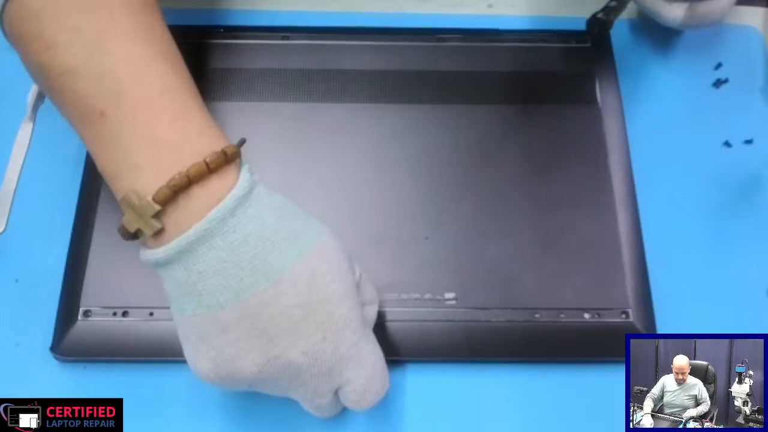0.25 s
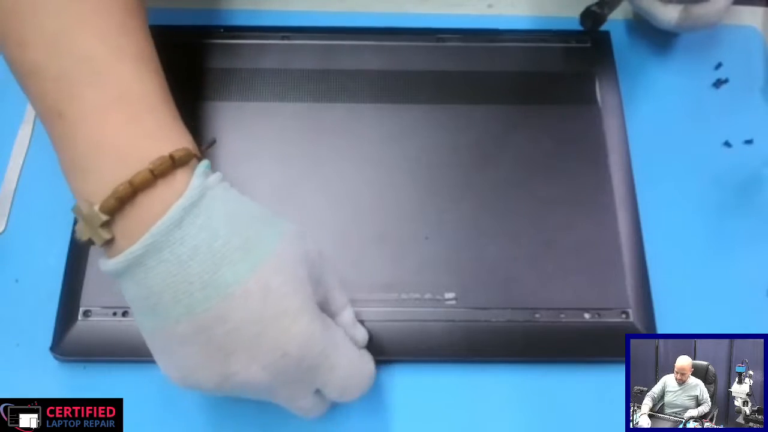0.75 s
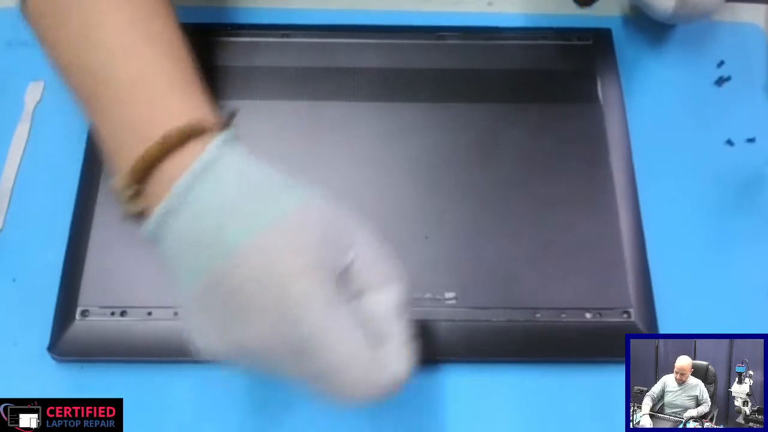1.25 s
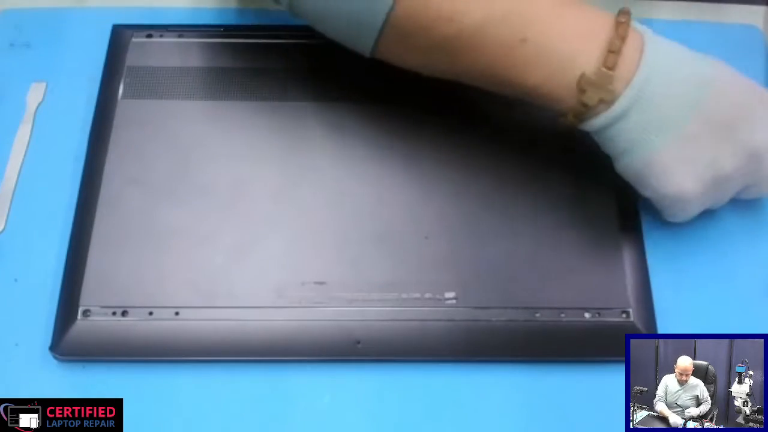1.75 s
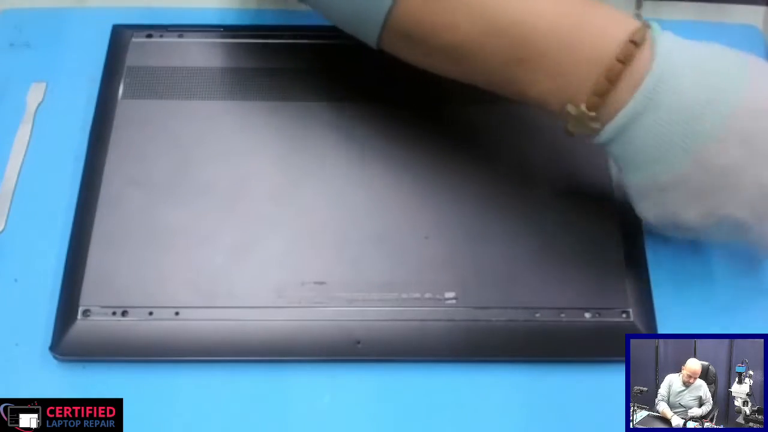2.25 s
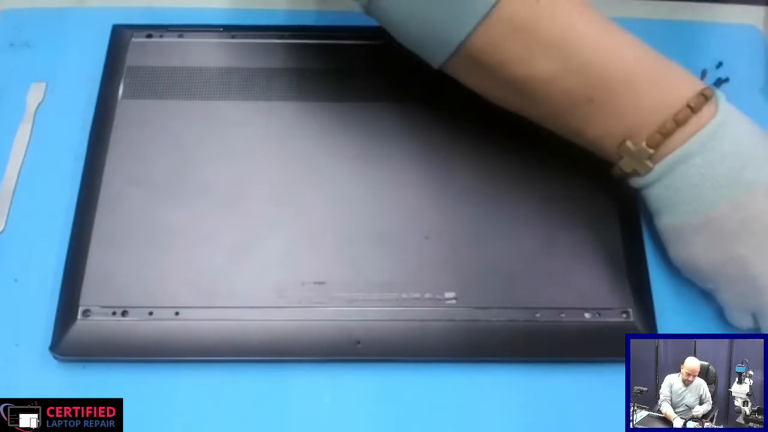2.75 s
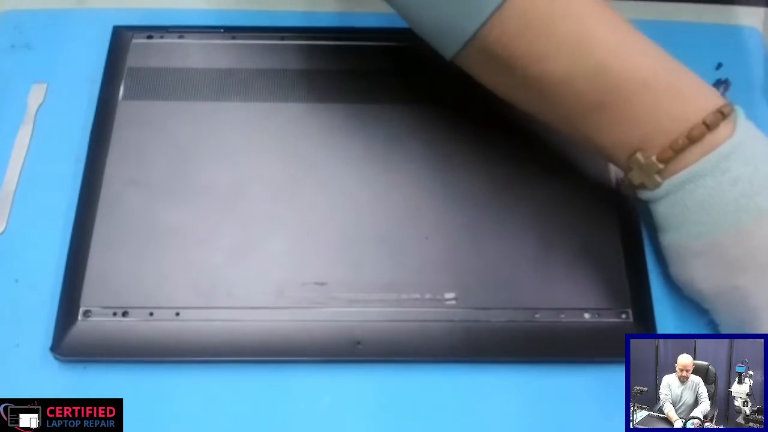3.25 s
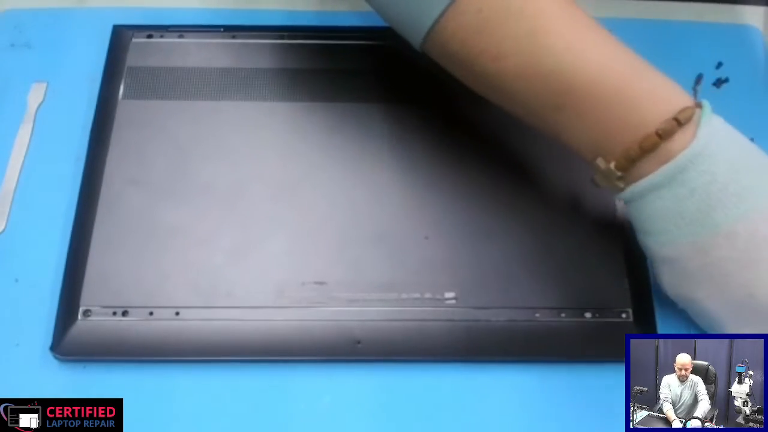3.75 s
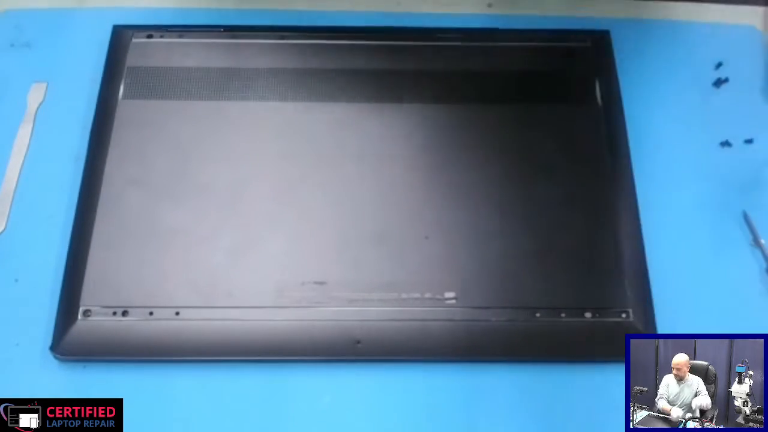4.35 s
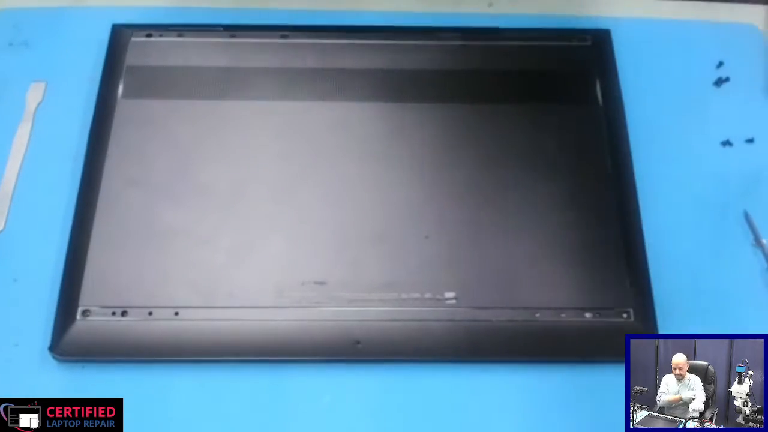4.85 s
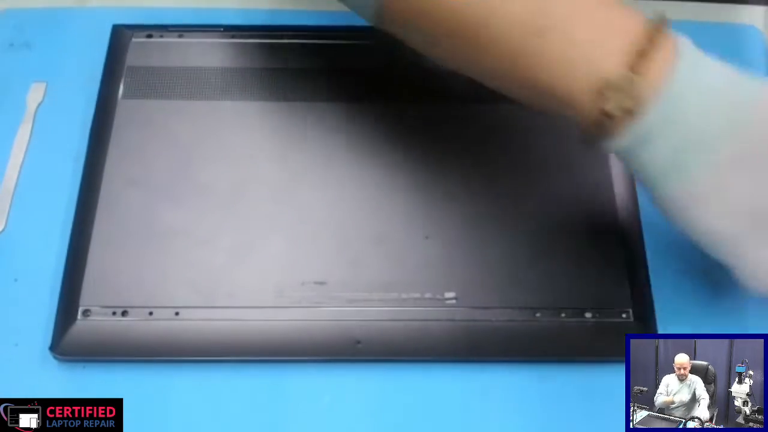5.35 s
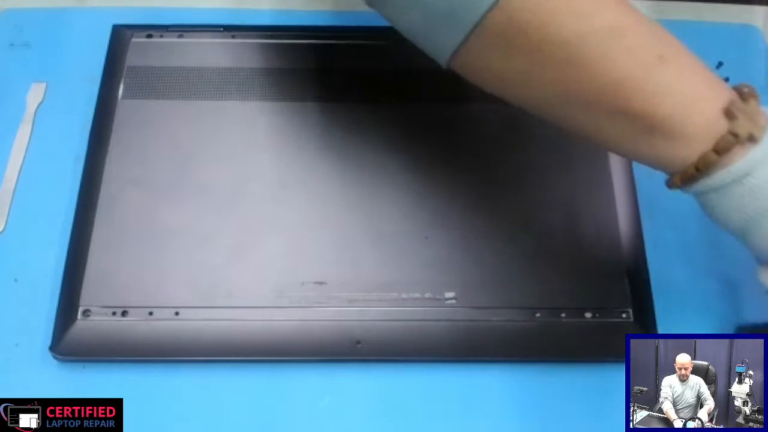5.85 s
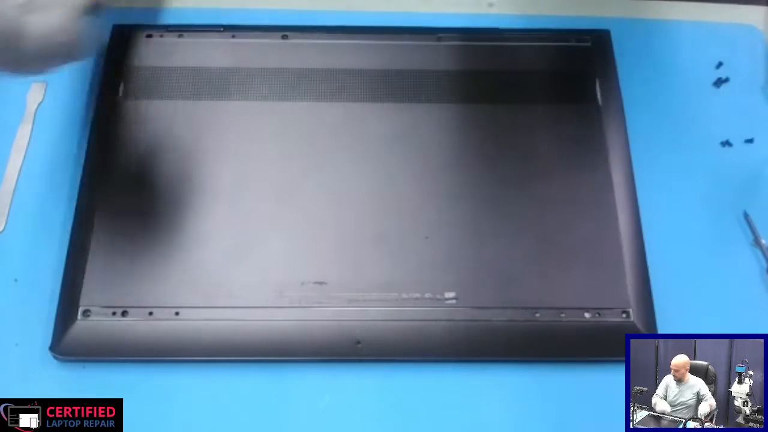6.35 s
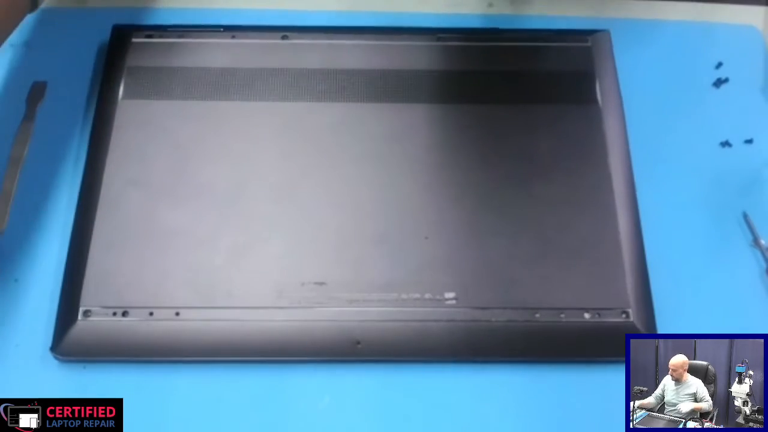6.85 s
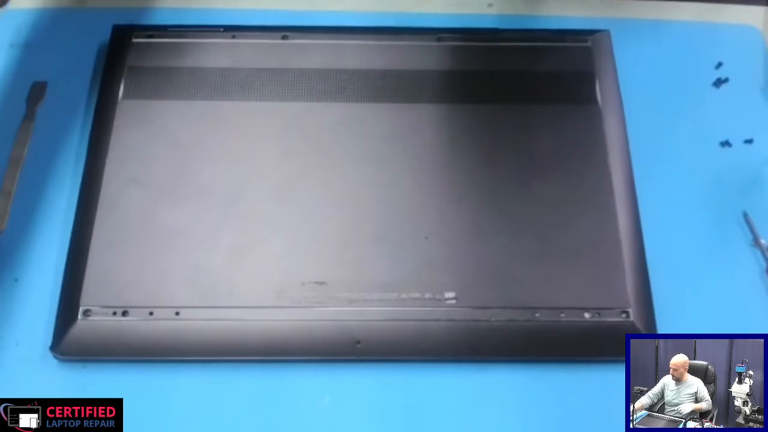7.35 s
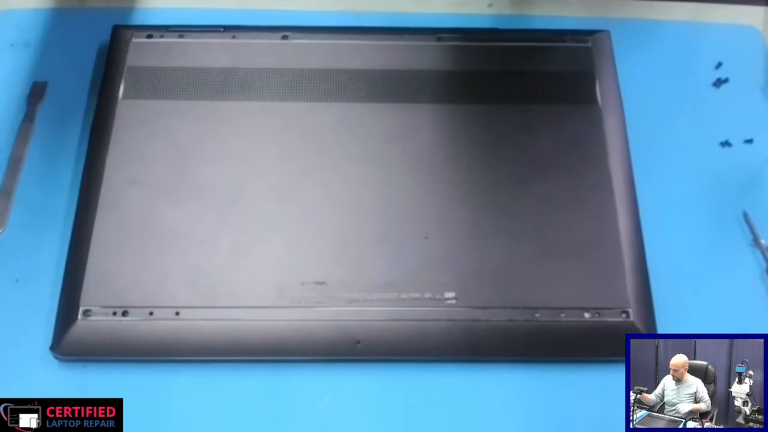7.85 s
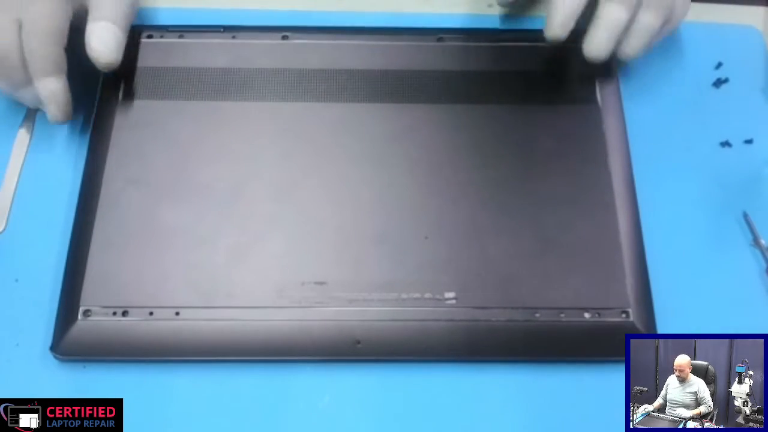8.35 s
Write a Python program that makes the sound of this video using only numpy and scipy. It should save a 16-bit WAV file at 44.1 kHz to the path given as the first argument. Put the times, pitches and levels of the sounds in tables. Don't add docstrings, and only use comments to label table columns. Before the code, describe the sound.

Screws drop and skitter on a thin plastic shell, metal tools tap and are tossed down, and a glove rubs briefly. Sparse soft clicks give way to loud bursts near the middle and end, separated by quiet gaps. Harder blows thump the wooden bench, while thin steel rings briefly. Close, slightly muffled-top microphone, short room tail, faint steady whine, and a distant vehicle fading out halfway.

```python
import sys
import numpy as np
from scipy import signal
from scipy.fft import rfft, irfft, next_fast_len
from scipy.io import wavfile
from scipy.ndimage import map_coordinates

SR = 44100
rng = np.random.default_rng(int(sys.argv[2]) if len(sys.argv) > 2 else 0)


def bounce(signal):
    frames = np.transpose(np.atleast_2d(signal))
    limited = np.clip(frames, -1, 1)
    pcm = np.round(limited * 32767).astype(np.int16)
    wavfile.write(sys.argv[1], SR, pcm)


def linear_from_db(decibels):
    return 10 ** (np.asarray(decibels, float) / 20)


N = 379701
LEAD_S = .008


def unit(x):
    return x / np.sqrt(np.mean(x ** 2) + 1e-20)


def along(points, hz):
    f, v = np.transpose(points)
    return np.interp(np.log(hz + 1), np.log(f + 1), v)


def curves(rows):
    s, *cols = np.transpose(rows)
    return [np.interp(np.arange(N) / SR, s, c) for c in cols]


def wobble(rate_hz):
    knots = rng.standard_normal(int(N * rate_hz / SR) + 4)
    return map_coordinates(knots, [np.arange(N) * rate_hz / SR])


def filtered(x, response):
    m = next_fast_len(x.shape[-1] + 8192)
    spectrum = rfft(x, m) * response(np.fft.rfftfreq(m, 1 / SR))
    return irfft(spectrum, m)[..., :x.shape[-1]]


def noise(spectrum, shape=N):
    return unit(filtered(rng.standard_normal(shape), lambda hz: linear_from_db(along(spectrum, hz))))


def resonances(peaks, f):
    total = 0
    for k, (hz, width_hz, db) in enumerate(peaks):
        damping = 1j * f * width_hz
        total = total + (-1) ** k * linear_from_db(db) * damping / (hz * hz - f * f + damping)
    return total


def decay(t, t60_s, rise_s):
    after = t - LEAD_S
    return linear_from_db(np.where(t < LEAD_S, 60 * after / rise_s, -60 * after / t60_s))


def place(times_s, sounds, count=5):
    length = sounds.shape[1]
    tracks = np.zeros((count, N + length))
    for k, s in enumerate(times_s):
        start = round((s - LEAD_S) * SR)
        tracks[k % count, start:][:length] += sounds[k]
    return tracks[:, :N]


SCREW_PINGS = [(.6634, -20.5, 1914), (.6816, -34, 1840), (1.3777, -40, 1880), (1.4302, -33, 1913),
               (1.8799, -28, 3800), (1.897, -34, 4100), (3.302, -14, 3660), (3.317, -30, 3620),
               (3.4508, -18.5, 4103), (3.4537, -22.5, 4130), (3.6559, -24, 4726), (3.8093, -35, 3410),
               (7.1315, -29, 4000), (5.0005, -52, 2450), (7.1142, -25.5, 4270), (7.1802, -7.5, 4265),
               (7.1806, -17, 3500), (7.273, -26, 1567), (7.755, -28, 4660)]
SHAFT_TINKS = [(4.0691, -18, 6070), (4.1312, -14.5, 6040), (4.221, -44, 3900), (4.2575, -40, 4810),
               (5.0002, -50, 4796), (5.979, -36.5, 3888), (6.8713, -25.5, 1653), (6.9962, -44, 5320),
               (7.1345, -25, 1700), (1.421, -39, 5175), (7.6634, -23, 4510), (7.7012, -15, 3930),
               (8.0371, -36, 4830)]
TIP_TICKS = [(.7695, -41.5, 5100), (1.2157, -30.5, 4700), (1.3603, -47.5, 2102), (3.101, -57, 4648),
             (3.2761, -17.5, 2440), (3.402, -35, 4750), (3.4095, -30.5, 4806), (3.787, -57, 4450),
             (4.149, -27, 4030), (4.3032, -34, 4850), (4.729, -52.5, 5400), (5.0634, -51.5, 4724),
             (5.3397, -17.5, 5630), (5.3711, -19.5, 3500), (5.4532, -22, 4970), (5.497, -31, 3480),
             (6.4069, -49, 5214), (7.9095, -11, 4750), (7.9895, -27, 3980), (5.4655, -19, 4760),
             (8.0512, -37, 4807), (8.0685, -42, 4710), (3.302, -21, 5600), (8.545, -36.5, 4554)]
PADDED_PATS = [
    (.9085, -53, 2388),
    (1.4137, -36, 4667),
    (2.2879, -47.5, 4830),
    (4.1827, -31.5, 4760),
    (5.2272, -2, 2416),
    (7.2037, -37.5, 3660),
]
SCREW_HOPS = [(3.466, -32, 3645, 872), (3.479, -34, 3700, 872), (3.4825, -40, 3600, 872),
              (3.492, -44, 3645, 872), (3.505, -48, 3645, 872), (3.517, -54, 3600, 872),
              (7.192, -20, 4050, 1230), (7.1955, -20, 4150, 1230), (7.2035, -28, 3800, 1230),
              (7.2085, -29, 3900, 1230), (7.218, -31, 3900, 1230), (7.2325, -33, 4100, 1230),
              (7.243, -35, 3900, 1230), (7.2455, -35, 3950, 1230)]
TWEEZER_CLINKS = [(3.6675, -43, 4750), (4.0548, -12.5, 4437), (4.0585, -17, 4900), (4.062, -17, 4500),
                  (4.069, -18, 4200), (4.073, -19, 5000), (4.077, -19, 4000), (4.0815, -19, 4300),
                  (4.1305, -22, 4200), (4.1655, -14, 4700), (4.171, -20, 5000), (4.178, -22, 4800),
                  (4.1024, -25.5, 3950), (4.1064, -21, 3850)]
HANDLE_SLAPS = [(2.4474, -53, 4800), (3.2959, -34, 2260), (5.478, -27, 3300), (5.5061, -37, 3300),
                (5.909, -58, 5580), (6.085, -58, 5820), (6.855, -27, 4850), (7.43, -23, 4126),
                (7.432, -30, 2650), (7.5193, -44, 4310), (8.0114, -34, 3990)]
TOOL_CLACKS = [(4.1641, -24, 4640), (5.2481, -7, 6870), (5.3496, -24, 2970), (5.3804, -39, 3330),
               (5.4063, -35.5, 4830), (6.572, -61.5, 5000), (6.8083, -34, 3100), (6.8344, -35, 5420),
               (6.8442, -38.5, 5030),  (7.8564, -10, 5100), (5.468, -27, 4810), (7.9659, -32, 4750)]
STEEL_JANGLES = [
    (7.6272, -13, 4840),
    (7.632, -20, 5900),
    (7.6365, -12, 4200),
    (7.695, -24, 4800),
    (7.702, -24, 4400),
    (7.7326, -29, 4080),
]
HARD_SNAPS = [
    (3.637, -5, 4670),
    (3.6375, 4.5, 4700),
    (4.0547, -1, 4200),
    (4.0548, -4, 5050),
    (7.1806, -10, 3600),
]
HANDLE_CRASHES = [(5.2215, -2, 4700), (5.2255, -7, 4900), (5.2515, -11, 5400), (5.257, -9, 5100),
                  (5.261, -10, 5900), (5.266, -16, 4700), (5.271, -11, 5800), (5.277, -19, 4600),
                  (5.283, -18, 4300), (5.291, -19, 3000), (5.301, -23, 3900), (5.315, -23, 4300),
                  (7.8555, -4, 5600), (7.861, -7, 4000), (7.875, -14, 6000), (7.884, -15, 2100),
                  (7.915, -21, 4000), (7.936, -25, 4700), (7.942, -26, 5800), (.664, -43, 4600),
                  (1.364, -51, 4700), (1.395, -52, 4500)]


def contacts():
    # crack/dB, brightness/dB per octave, crack top/Hz, t60/s, room share/dB, crack loss an octave off ring/dB
    kinds = [(SCREW_PINGS, (-15, -1, 5600, .014, -5, 6)),
             (SHAFT_TINKS, (-16, 1, 6200, .042, -3, 3)),
             (TIP_TICKS, (-3, 1, 7200, .015, -2.5, 4)),
             (PADDED_PATS, (-3, -9, 5400, .011, -6, 2)),
             ([hop[:3] for hop in SCREW_HOPS], (-2, 2, 4800, .009, -8, 30)),
             (TWEEZER_CLINKS, (-4, 5, 6200, .016, -1, 8)),
             (HANDLE_SLAPS, (-3, -1.5, 7000, .037, -.1, 2)),
             (TOOL_CLACKS, (5.5, -1, 8500, .05, 1.2, 1.2)),
             (STEEL_JANGLES, (2, 5, 7600, .05, 1.2, 5)),
             (HARD_SNAPS, (-20, 5, 6800, .008, -3, 0)),
             (HANDLE_CRASHES, (2, -1, 8500, .018, -2, 1.5))]
    return sorted(tuple(row) + kind for rows, kind in kinds for row in rows)


# f/Hz, width/Hz, level/dB
SHELL = [(1600, 250, -10), (2037, 220, -6.5), (2384, 300, -3.5), (3200, 380, -1.5), (3825, 110, 0),
         (3980, 780, -8), (4750, 770, 1), (5400, 120, -6), (6020, 300, -4), (7300, 1000, -8)]


def taps():
    columns = np.transpose(contacts())[:, :, None]
    s, db, ring_hz, crack_db, bright_db, top_hz, t60_s, room_db, focus_db = columns
    t = np.arange(SR // 8) / SR
    t60_s = np.clip(t60_s, .003, .15)
    chance = rng.standard_normal((len(s), len(t) + 1))
    neighbour_hz = ring_hz * (1 + .04 * chance[:, :1])
    ring = np.sin(2 * np.pi * ring_hz * t) + .35 * np.sin(2 * np.pi * neighbour_hz * t)

    def shell_response(f):
        near_ring = linear_from_db(-np.abs(focus_db) * np.log2((f + 1) / ring_hz) ** 2)
        tilt = linear_from_db(bright_db * np.log2(np.clip(f, 2200, 7000) / 4000))
        return resonances(SHELL, f) * near_ring * tilt / (1 + (f / top_hz) ** 8)

    crack = filtered(chance[:, 1:], shell_response)
    crack = linear_from_db(crack_db) * crack / crack.std(axis=1, keepdims=True)
    rise_s = np.clip(0.24 * t60_s, .003, .007)
    blow = linear_from_db(db) * decay(t, t60_s, rise_s)
    sent = linear_from_db(room_db) * (linear_from_db(-19) * ring + linear_from_db(-9.5) * crack)
    return place(s[:, 0], blow * (ring + crack)), place(s[:, 0], blow * sent)


KNOCKS = [(.6643, -38, 850), (1.3787, -49, 820), (1.8827, -45, 1187), (1.8973, -49, 1194),
          (3.2792, -18.5, 1347), (3.4541, -32, 869), (3.6381, -52, 1323), (5.2276, -11, 1268),
          (5.23, -14, 1560), (5.255, -12, 1200), (1.425, -48, 850), (5.265, -17, 1180), (5.283, -20, 1175),
          (5.3538, -26.5, 1117), (5.4049, -39.5, 1220), (5.456, -35, 1430), (5.473, -31.5, 1410),
          (6.816, -41.5, 1340), (6.8694, -38.5, 1443), (7.1161, -44.5, 1255), (7.1333, -36.5, 1440),
          (7.1811, -30, 1265), (7.182, -33, 870), (7.4322, -47.5, 1156), (7.6357, -41, 1480)]
BUMPS = [(2.9794, -46, 330.6), (4.0535, -24.5, 319), (4.0755, -29.5, 491), (4.1018, -35, 360),
         (4.1272, -31.5, 283), (4.1462, -35, 332), (4.2074, -40.5, 430), (5.227, -11, 560),
         (5.252, -10, 328), (5.313, -26, 330)]
THUDS = [(3.2805, -22, 597), (4.168, -39, 471.6), (5.26, -27, 249.6), (5.470, -45, 177.3),
         (6.822, -43, 374.7), (7.640, -38, 321), (7.6982, -32.5, 318.6), (7.8573, -22, 459),
         (7.86, -40, 80), (5.36, -40, 85), (4.12, -44, 130), (7.9196, -28.5, 607)]


def bench_blows():
    kinds = [(KNOCKS, .04), (BUMPS, .04), (THUDS, .1)]
    return sorted((*row, t60_s) for rows, t60_s in kinds for row in rows)


# f/Hz, level/dB per Hz
BENCH = [(150, -30.5), (320, -1), (520, 0.5), (850, -4), (1250, -3), (1700, -16.5), (3000, -46.5)]


def knocks():
    s, db, hz, t60_s = np.transpose(bench_blows())[:, :, None]
    t = np.arange(SR // 6) / SR
    blow = linear_from_db(db) * decay(t, np.clip(t60_s, .01, .2), rise_s=.008)
    thud = filtered(noise(BENCH, (len(s), len(t))), lambda f: linear_from_db(-7.5 * np.log2((f + 1) / hz) ** 2))
    thud = linear_from_db(-2.5) * thud / thud.std(axis=1, keepdims=True)
    mode = 0.84 * np.sin(2 * np.pi * hz * t)
    times_s = s[:, 0] - .0015
    return place(times_s, blow * mode), place(times_s, blow * thud)


# t/s, peak level/dB, f/Hz, t60/s
STEEL_RINGS = [(3.642, -33, 4880, .42), (3.66, -51, 3500, .3), (3.638, -30, 2850, .03), (7.87, -28, 4800, .55),
               (7.87, -33, 3980, .5), (7.87, -33, 6020, .4), (7.86, -30, 1600, .2), (7.865, -29, 540, .2),
               (7.87, -24, 2150, .3), (7.88, -30, 1850, .3),
               (7.64, -34, 6050, .45), (7.7, -30, 3950, .3), (7.431, -30, 2650, .08), (5.3, -32, 4800, .5),
         (4.17, -40, 6070, .3), (4.17, -38, 4850, .3), (3.642, -45, 6300, .12), (3.657, -34, 3606, 0.076),
         (4.059, -23, 6073, .08), (4.068, -24, 3980, 0.1), (4.183, -33, 2480, .06), (4.108, -28, 4020, .06),
         (4.104, -30.5, 6160, 0.038), (4.166, -24, 2505, 0.083), (6.871, -36, 1600, 0.084),
         (6.989, -47, 5370, 0.11), (7.114, -38, 5280, 0.085), (7.139, -22.5, 1763, 0.13),
         (7.143, -26, 1600, .05), (7.14, -38, 4850, .07), (7.136, -44, 2300, .12), (7.276, -49, 2300, .1),
         (7.14, -38, 5310, 0.058), (7.273, -30.5, 1560, 0.072), (7.277, -45, 5300, 0.054),
         (7.433, -32.5, 2965, 0.12), (7.634, -29, 1521, .11), (7.859, -12, 3980, 0.09),
         (7.628, -20, 6050, .13), (7.628, -23, 3950, .1), (7.64, -30, 2520, .15), (7.735, -38, 6050, .12),
         (7.858, -15, 6020, .16), (7.86, -18, 2050, .13), (7.911, -25, 1500, .05), (5.35, -32, 3050, .15),
         (5.468, -25, 2500, .09), (5.468, -27, 4800, .12), (5.23, -14, 1650, .06), (5.252, -14, 1604, .11),
         (5.255, -20, 3058, .15), (5.256, -24, 1080, .25), (5.475, -42, 500, .2), (5.979, -50, 5950, .03),
         (3.66, -40, 4700, .2), (3.452, -40, 1250, .15)]


def shaft():
    s, db, hz, t60_s = np.transpose(STEEL_RINGS)[:, :, None]
    t = np.arange(SR // 2) / SR
    rough = unit(filtered(rng.standard_normal((len(s), len(t))), lambda f: f < 70))
    ring = np.sin(2 * np.pi * hz * t + .6 * rough) + .3 * np.sin(2 * np.pi * 1.012 * hz * t)
    return place(s[:, 0], linear_from_db(db) * ring * decay(t, t60_s, rise_s=LEAD_S))


# ratio to the hop's base f, level/dB
COVER_MODES = [(.7, -1), (1, 0), (1.42, -8), (1.83, -5)]


def cover():
    rows = [(s, db + mode_db - 11, cover_hz * ratio)
            for s, db, _, cover_hz in SCREW_HOPS for ratio, mode_db in COVER_MODES]
    s, db, hz = np.transpose(rows)[:, :, None]
    t = np.arange(SR // 8) / SR
    return place(s[:, 0], linear_from_db(db) * np.sin(2 * np.pi * hz * t) * decay(t, t60_s=.045, rise_s=.006))


# t/s, level/dB
RUB = [
    [(4.83, -80), (4.86, -57), (4.91, -62), (4.95, -55), (4.98, -72), (5.11, -68.5), (5.19, -62),
     (5.21, -51)],
    [(5.89, -79), (5.91, -58.5), (6.04, -64.5), (6.07, -70), (6.09, -61), (6.19, -69), (6.3, -77.5)],
]
# f/Hz, width/Hz, level/dB
RUBBED_SURFACES = [
    [(3400, 300, -20), (4250, 150, -12), (4830, 130, 0), (5750, 200, -15)],
    [(2050, 120, -6), (2450, 120, -9), (3100, 120, -5), (3950, 150, -6), (4600, 300, -2), (5000, 150, -4),
     (5450, 120, -3), (5800, 120, -2)],
]


def glove():
    t = np.arange(N) / SR
    total = np.zeros(N)
    for rows, surface in zip(RUB, RUBBED_SURFACES):
        stroke = linear_from_db(np.interp(t, *np.transpose(rows), left=-120, right=-120))
        grains = rng.standard_normal(N) * linear_from_db(3 * wobble(300) + 1.5 * wobble(30))
        total += stroke * unit(filtered(grains, lambda f: resonances(surface, f)))
    return total


# f/Hz, t60/s
ROOM = [(200, 0.37), (1000, 0.43), (2000, .4), (3000, 0.33), (5000, 0.4), (6500, .29), (8000, 0.2)]


def room(tracks):
    hz, t, z = signal.stft(rng.standard_normal((len(tracks), SR // 2)), SR, nperseg=256)
    tail = signal.istft(z * linear_from_db(-60 * t / along(ROOM, hz)[:, None]), SR, nperseg=256)[1]
    onset = np.clip(np.arange(tail.shape[1]) / SR / 0.0047, 0, 1) ** 2
    tail = tail * onset
    tail = tail / np.linalg.norm(tail, axis=1, keepdims=True)
    return signal.fftconvolve(tracks, tail, axes=1)[:, :N].sum(axis=0)


# t/s, firing f/Hz, load level/dB
ENGINE = [(0, 42.8, -63), (.56, 44.13, -66), (.68, 49, -48), (.8, 52.5, -45), (.95, 53.74, -39),
          (1.03, 58, -57), (1.11, 62, -41), (1.3, 64.74, -34.5), (1.6, 65.06, -43), (2.1, 67.1, -47.5),
          (2.32, 66.8, -61.5), (2.6, 68.23, -55.5), (2.95, 68.4, -76), (3.3, 68.45, -53), (3.55, 68.9, -51),
          (3.95, 67.6, -59.5), (4.5, 68.4, -59.5), (4.9, 69.85, -71)]
# level at mean load/dB, share of load swing, loss with distance/dB per s
ORDERS_OUT = [(-51.5, 1.01, 0), (-49, .75, 1.8), (-54, 0.45, 3), (-53, 0.16, 6), (-64.5, 0.16, 5.5)]


def vehicle():
    hz, load_db = curves(ENGINE)
    t = np.arange(N) / SR
    turn = 2 * np.pi * np.cumsum(hz) / SR
    mean_load_db = -50
    total = np.zeros(N)
    for order, (db, swing, loss_db_per_s) in enumerate(ORDERS_OUT, 1):
        level_db = db + swing * (load_db - mean_load_db) - loss_db_per_s * t
        unsteady_db = 3 + 2.5 * wobble(6) + 1.5 * wobble(25)
        total += linear_from_db(level_db + unsteady_db) * np.sin(order * turn + .8 * wobble(12))
    return np.clip((5.1 - t) / 0.43, 0, 1) * total


# t/s, level/dB
STREET = [(0, -58.5), (.6, -57), (1.3, -56.5), (2.2, -60), (3, -63), (3.5, -58.5), (4.3, -62), (4.8, -64),
          (5.4, -63), (6.1, -60.5), (6.6, -66), (7.2, -61), (8, -65), (8.6, -58.5)]
# f/Hz, level/dB per Hz
RUMBLE = [(12, -33.5), (20, -6), (124, 1), (219, -4), (295, -11), (331, -8.5), (370, -11.5), (639, -18),
          (1800, -31.5), (2340, -59), (3960, -120)]
# f/Hz, level/dB per Hz
FAN = [(710, -41.5), (1200, -11), (1410, -17), (1760, -14), (2160, -9.5), (3310, -14), (3700, -6.5),
       (4070, 1), (4240, 0), (5640, -17.5), (8000, -23), (10400, -45), (17600, -120)]


def air():
    rumble = linear_from_db(curves(STREET)[0] + 0.87 * wobble(3.5)) * noise(RUMBLE)
    fan_db = -68.0 + wobble(2) + .6 * wobble(9)
    return rumble + linear_from_db(fan_db) * noise(FAN)


def scene():
    touch, sent = taps()
    mode, thud = knocks()
    steel = shaft() + cover()
    echo = room(sent + linear_from_db(-18.5) * (mode + steel) + linear_from_db(-9.5) * thud)
    direct = (touch + mode + steel + thud).sum(axis=0)
    mono = direct + echo + vehicle() + glove() + air()
    return np.array([mono, mono])


def top_cut(x):
    return signal.sosfilt(signal.butter(12, 15680, fs=SR, output="sos"), x)


# f/Hz, level/dB per Hz
HISS = [(3530, -31), (6000, -6), (7230, -3.5), (10100, -1.5), (11400, -8.5), (14600, -11.5), (15500, -15)]


def record(dry):
    top_hz, sag_hz = 8230, 7900
    heard = filtered(dry, lambda hz: 1 / (1 + (hz / top_hz) ** 60) / (1 + (hz / sag_hz) ** 10))
    clipped = np.clip(heard, -1, 1)
    drift = linear_from_db(-20) * filtered(np.abs(clipped), lambda hz: 1 / (1 + 1j * hz / 15) ** 2)
    lag_s = np.array([[.35], [-.35]]) / SR
    late = filtered(clipped + linear_from_db(-79) * noise(HISS), lambda hz: np.exp(-2j * np.pi * hz * lag_s))
    return top_cut(late + drift)


dry = scene()
out = record(dry)
bounce(out)
```